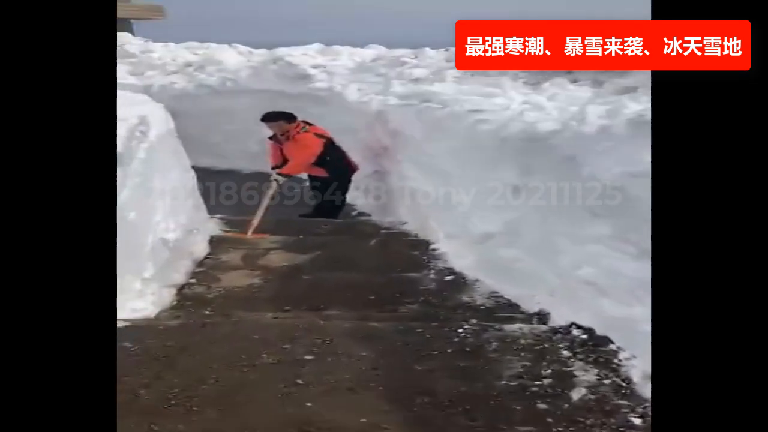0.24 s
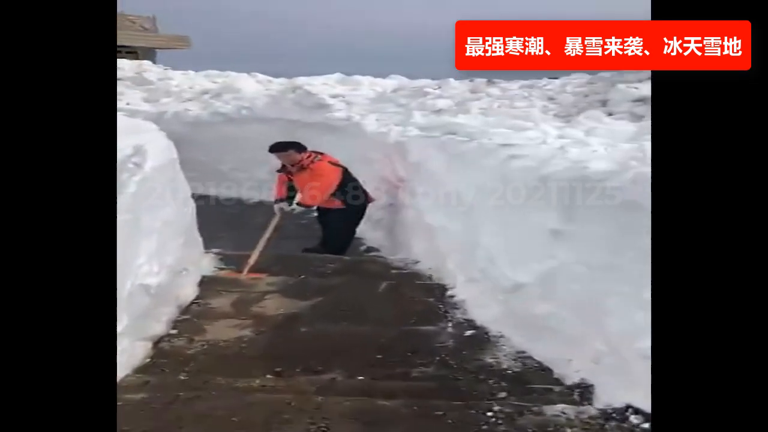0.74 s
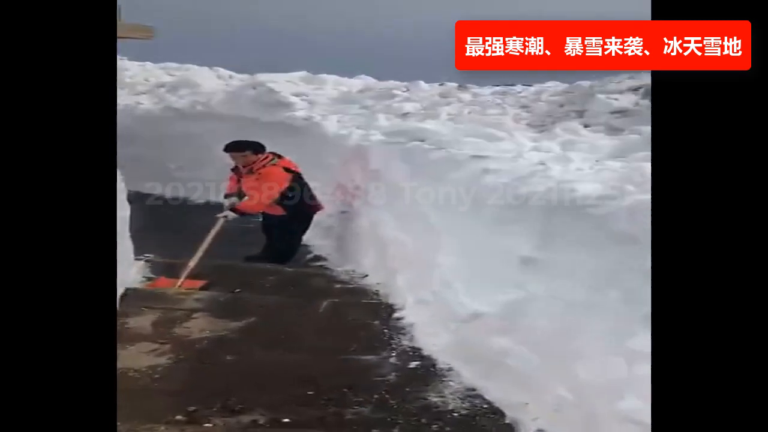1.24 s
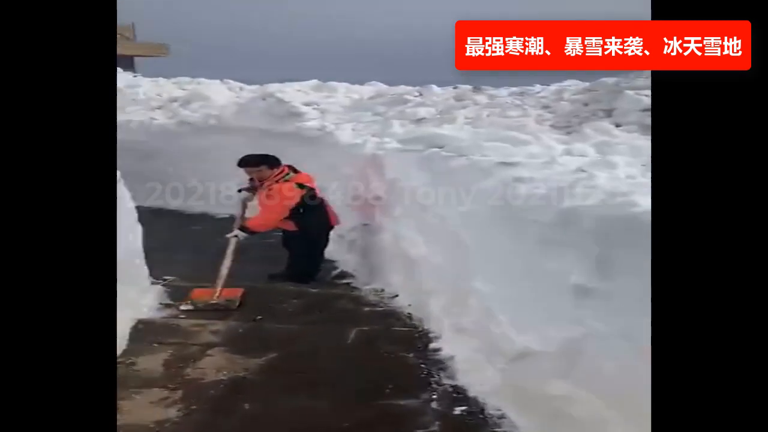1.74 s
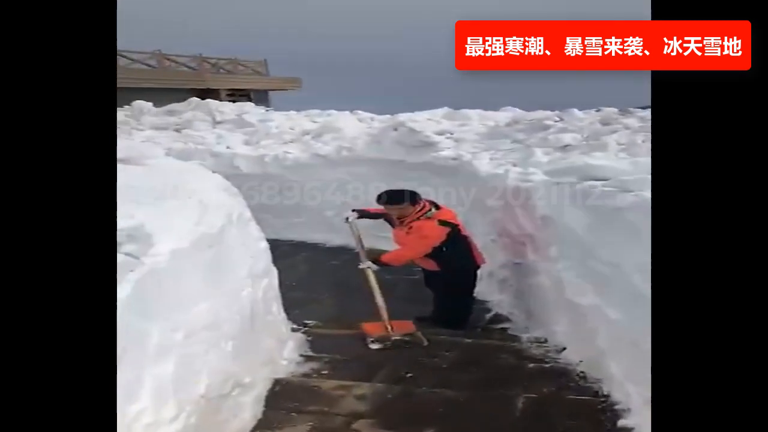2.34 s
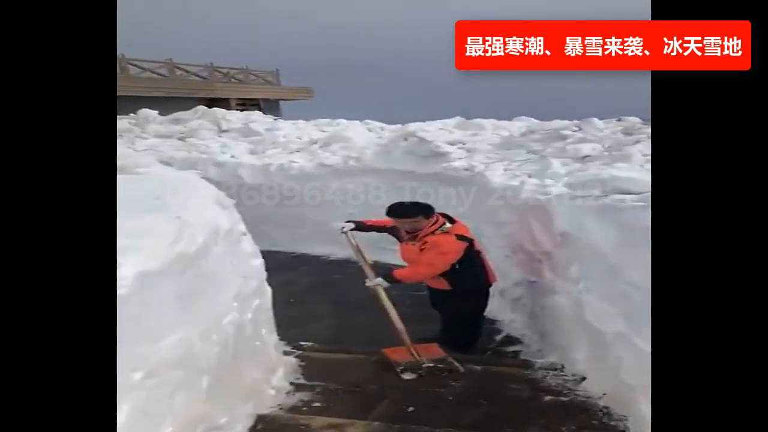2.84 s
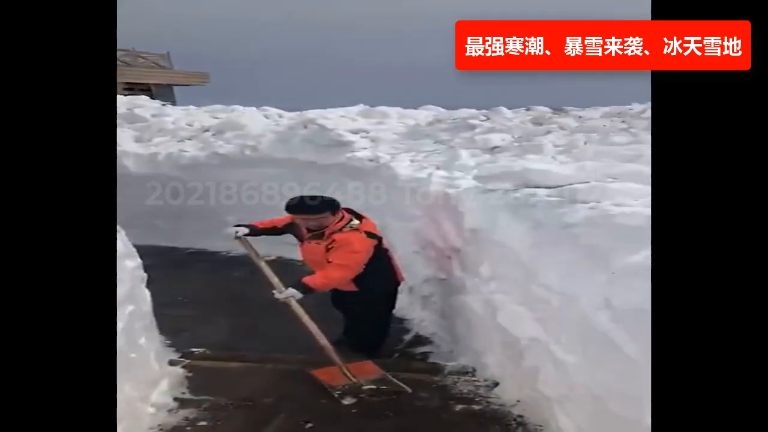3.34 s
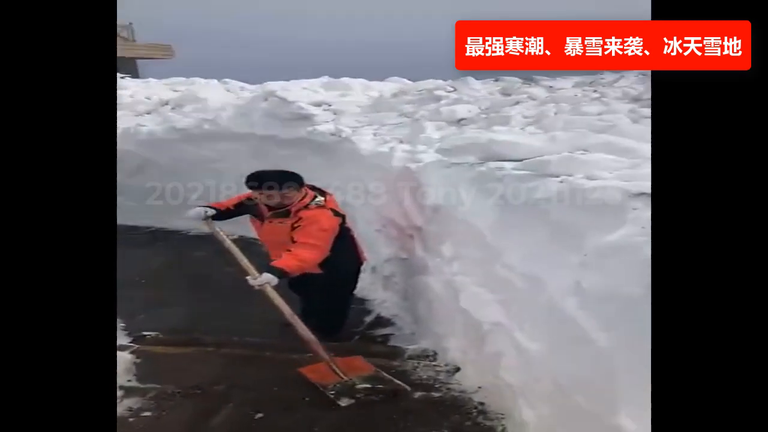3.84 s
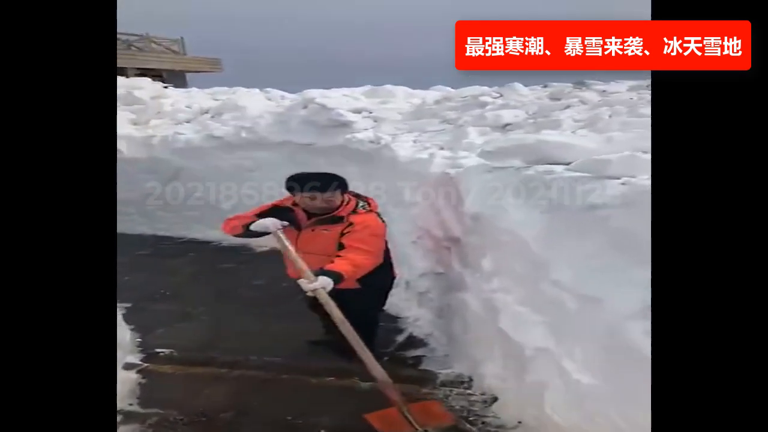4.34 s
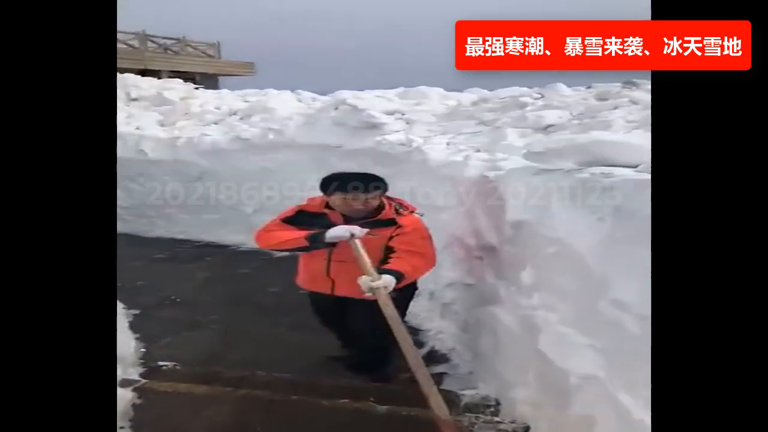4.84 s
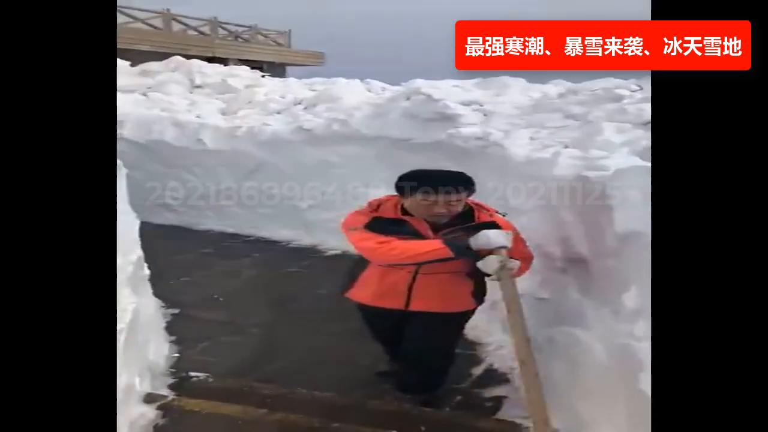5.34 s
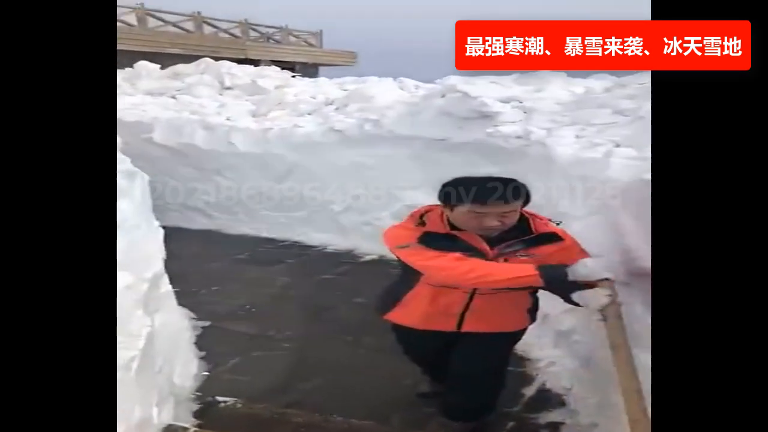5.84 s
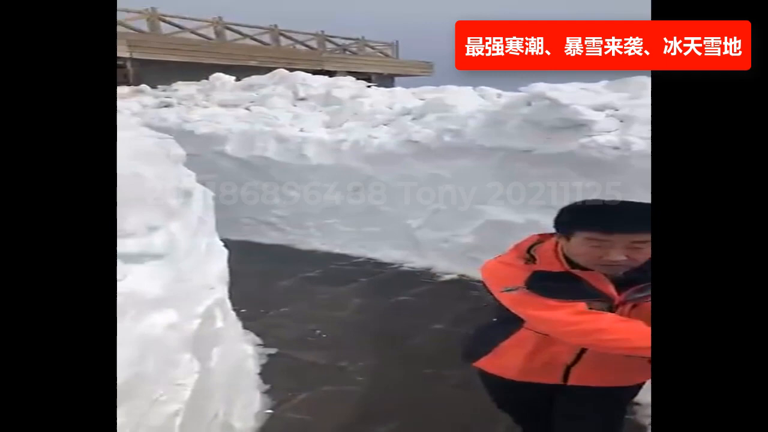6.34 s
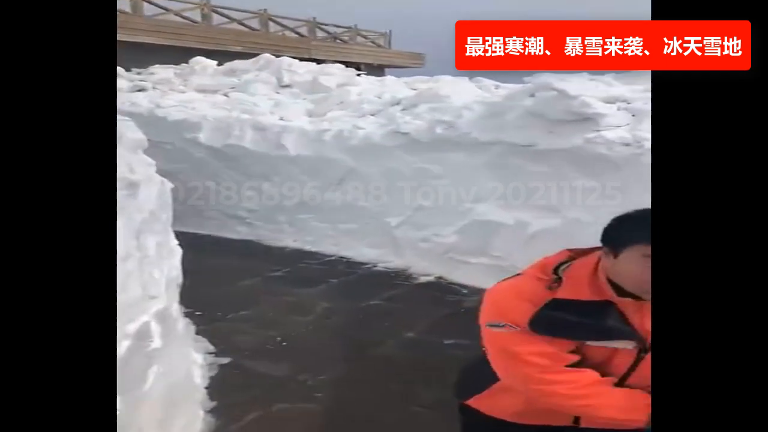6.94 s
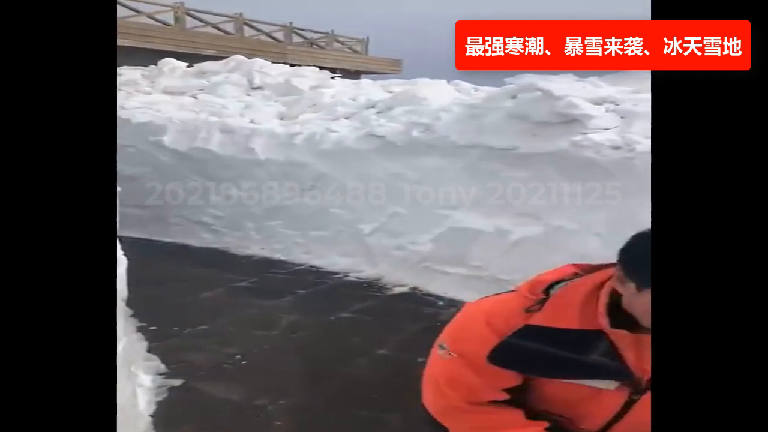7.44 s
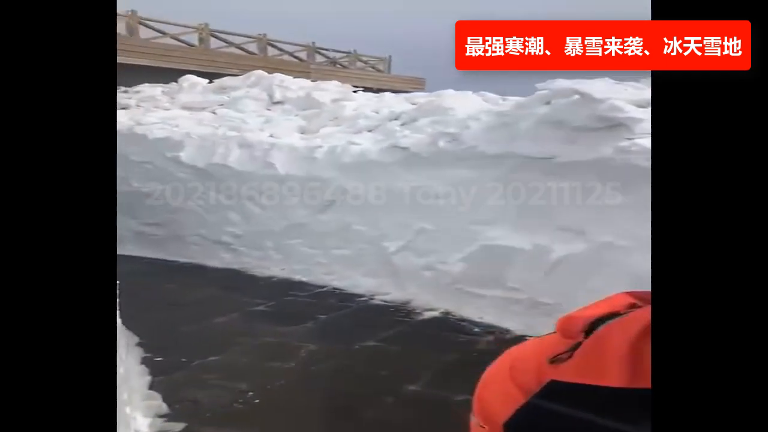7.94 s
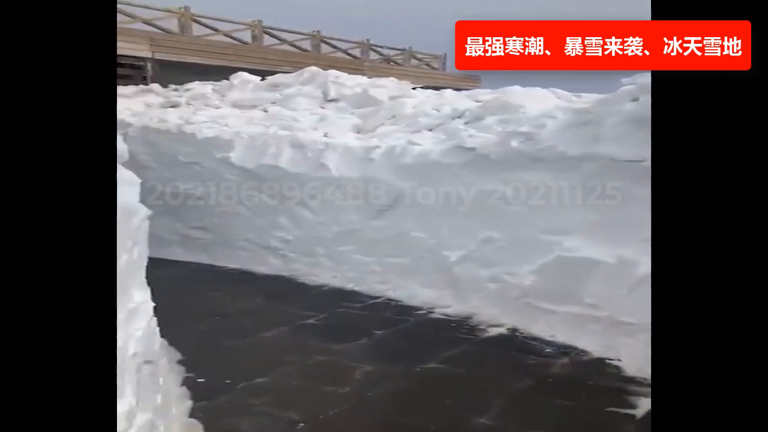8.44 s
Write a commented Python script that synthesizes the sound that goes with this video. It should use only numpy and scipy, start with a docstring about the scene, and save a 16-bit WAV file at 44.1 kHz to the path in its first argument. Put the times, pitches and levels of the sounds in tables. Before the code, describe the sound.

A shovel is pushed over rough paving between snow walls, heard close, the same in both channels, with lumpy wind rumble on the microphone and faint hiss throughout. It opens with a brief scrape, then light ticks and scuffs, with very faint, airy low moans near 0.3 and 1.2 s. From 1.8 s the knocks grow harder, with a loud clack at 2.1 s and scattered taps after. From about 3.2 to 5.2 s forceful shoves grind, ringing the blade with harsh grit and crunching snow; a sharp hit at 3.9 s clips. A quieter gap holds a few knocks. At 6 s a bright crack starts another crunchy scrape, ending with a heavy knock and thump at 6.66 s. Then scraping turns faint, with sparse taps, a barely audible moan at 7.8 s, dull thumps around 8.2 s and small clicks to the end at 8.7 s. The echo is short and dry.

```python
"""A shovel blade is dragged and pushed over a paved path between snow walls: 8.7 s, in order of time.
First come scrapes and knocks on the paving, with two faint moans; the knocks grow from 1.8 s.
From 3.2 s hard shoves excite the blade's modes with grit and crush snow; another scrape follows at 6 s.
A heavy knock and thump fall at 6.66 s; then quieter knocks, fainter scraping, a late moan and more thumps.
Boots thump, noise rumbles as wind on the microphone throughout, and the highest peaks clip."""
import sys
import numpy as np
from scipy import signal
from scipy.fft import rfft, irfft, next_fast_len
from scipy.io import wavfile
from scipy.ndimage import uniform_filter1d

SR = 44100
rng = np.random.default_rng(int(sys.argv[2]) if len(sys.argv) > 2 else 0)


def pcm_store(signal):
    """Save signal as 16-bit PCM."""
    levels = np.round(np.clip(np.atleast_2d(signal), -1, 1) * 32767)
    wavfile.write(sys.argv[1], SR, levels.astype(np.int16).T)


N = 383229  # samples in the scene


def gain_of(db):
    """Level to amplitude ratio: 20 dB is a factor of ten."""
    return 10 ** (np.asarray(db) / 20)


def evened(x):
    """Power normalisation: scales a signal to rms 1."""
    return x / np.sqrt(np.mean(x ** 2) + 1e-20)


def curves(rows):
    """Linear interpolation: each column after t/s becomes one value a sample."""
    times, *columns = np.transpose(rows)
    return [np.interp(np.arange(N) / SR, times, column) for column in columns]


def add(mix, s, sound):
    """Superposition: adds a sound into the mix at time s."""
    part = mix[..., max(round(s * SR), 0):][..., :sound.shape[-1]]
    part += sound[..., :part.shape[-1]]


def colour(x, points):
    """Spectral shaping: weights x along a log-frequency axis, then scales it to rms 1."""
    f, db = np.transpose(points)
    size = next_fast_len(N)
    hz = np.fft.rfftfreq(size, 1 / SR)
    weight = gain_of(np.interp(np.log(hz + 1), np.log(f + 1), db))
    return evened(irfft(rfft(x, size) * weight)[:N])


def wander(per_s):
    """Low-passed random process of rms 1 that changes about per_s times a second."""
    span = max(round(SR / per_s / 2), 2)
    once = uniform_filter1d(rng.standard_normal(N), span)
    return evened(uniform_filter1d(once, span))


def grit(level_db, per_s, spread_db):
    """Shot noise: random clicks of either sign, a few large, denser as the stroke gets harder."""
    # per_s is the click rate at a level of -19.5 dB
    rate = np.clip(per_s * gain_of(.4 * (level_db + 19.5)) / SR, .01, 1)
    clicks = (rng.random(N) < rate) / np.sqrt(rate)  # power independent of density
    size_db = spread_db * np.minimum(rng.exponential(1, N), 5)
    return gain_of(level_db) * evened(clicks * gain_of(size_db) * rng.standard_normal(N))


# Underlying scrape of the edge throughout, faint to strong, beneath the shoves: t/s, ring level/dB,
# brightness/(dB per octave), snow crunch level relative to the ring/dB
SCRAPE_BED = [(0.0, -17.5, -14, -12.5), (0.14, -37, -9, -6.5), (0.56, -35.5, -2.5, -11.5),
              (0.75, -46.5, -2, -8.5), (0.94, -53.5, 0, 1.5), (1.19, -30, -0.5, -5),
              (1.27, -31.5, -5.5, -10), (1.43, -44, -1, -8.5), (1.64, -36, 3, -19.5),
              (1.76, -35.5, -3, -11.5), (1.8, -48, -15, -7), (2.05, -27.5, 1, -10.5),
              (2.25, -36.5, -5.5, -7), (2.5, -31, -3, -13), (2.79, -35, -2, -10), (3.05, -26, -1, -8.5),
              (3.22, -20.5, -3.5, -12.5), (3.3, -19, 3.5, -7), (3.95, -14.5, 2, -10),
              (4.33, -15.5, 0.5, -6), (4.45, -12.5, 2.5, -11.5), (4.6, -19.5, -7, -4.5),
              (4.64, -21.5, -4, -7), (5.1, -19, 3, -6.5), (5.18, -36, 2, -1.5), (5.3, -37.5, 2, -6),
              (5.42, -29.5, -5.5, -16), (5.61, -43.5, -4, -16.5), (5.97, -32, 4, -10.5),
              (6.05, -27, 12, -1.5), (6.3, -23.5, -1, -1.5), (6.325, -26.5, -16, -1), (6.4, -29, -5, -9.5),
              (6.63, -26, -2, -8), (6.71, -26.5, -4, -15.5), (6.74, -54.5, 9, 1), (7.24, -37, -2.5, -5.5),
              (7.57, -41.5, -1.5, -6.5), (7.82, -45, 1, -8.5), (8.08, -38, 2, -3.5), (8.4, -36.5, -2, -15),
              (8.69, -37, 6, 2.5)]
# Shoves and scuffs on top: start t/s, length/s, ring level/dB, brightness/(dB per octave),
# snow crunch level relative to the ring/dB
SHOVES_AND_SCUFFS = [(0.018, 0.02, -19, -8, -18), (0.248, 0.047, -29.5, -5, -23.5),
                     (1.632, 0.086, -35.5, 3.5, -10), (1.873, 0.045, -19, 5.5, -10.5),
                     (2.275, 0.026, -18, -3.5, -12), (2.434, 0.017, -19.5, -4, -9.5),
                     (2.552, .13, -30.5, -8, -12), (2.724, 0.029, -28, -1, -10.5),
                     (2.845, 0.016, -22, -1, -14.5), (3.062, .04, -31.5, -1, 2),
                     (3.279, .02, -10.5, -2.5, -9.5), (3.322, 0.009, -12.5, 0, -8.5),
                     (3.35, 0.033, -15.5, -2, -1.5), (3.424, 0.049, -9.5, -1.5, -9.5),
                     (3.499, 0.11, -14.5, -4, -7), (3.692, 0.048, -18, 2.5, -0.5),
                     (3.819, 0.051, -9.5, 4, -4.5), (3.887, 0.069, -10, 1.5, -8),
                     (3.986, 0.013, -12.5, 0, -8.5), (4.051, 0.015, -8, -1, -14),
                     (4.098, 0.045, -11.5, 0.5, -10), (4.193, 0.042, -11.5, 2, -10.5),
                     (4.261, 0.035, -8.5, 3, -7.5), (4.464, 0.032, -13, 1.5, -5),
                     (4.533, 0.034, -13, 3, -5.5), (4.686, .04, -11.5, 2, -7), (4.743, 0.15, -6, 1.9, -8),
                     (4.917, 0.14, -11.5, 0, -6), (5.523, 0.033, -32, -1.5, -22),
                     (5.663, .025, -26, 4.5, -15), (6.012, 0.016, -17.5, -1, -9.5),
                     (6.07, 0.24, -14, 1, -6), (6.253, 0.04, -22.5, 0, -2), (7.598, 0.045, -30, -2.5, -6.5),
                     (8.124, .07, -24, -4.5, -10.5), (8.243, 0.085, -29, 1.5, -7)]
RISE_DB_PER_S, SAG_DB_PER_S, FALL_DB_PER_S = 457, 22.5, 380  # a shove bites, tires, then lets go


def stroke():
    """Power addition of scrape and shoves: ring/dB, power-weighted brightness and crunch/dB."""
    scrape_db, scrape_bright, scrape_crunch_db = curves(SCRAPE_BED)
    ring = gain_of(2 * scrape_db)  # doubled decibels give power
    bright = ring * scrape_bright
    crunch = ring * gain_of(2 * scrape_crunch_db)
    for s, length, db, tilt, snow_db in SHOVES_AND_SCUFFS:
        u = np.arange(N) / SR - s
        drop_db = RISE_DB_PER_S * np.maximum(-u, 0) + SAG_DB_PER_S * np.maximum(u, 0)
        drop_db += FALL_DB_PER_S * np.maximum(u - length, 0)  # added to the sag
        power = gain_of(2 * (db - drop_db))
        ring = ring + power
        bright = bright + tilt * power
        crunch = crunch + gain_of(2 * snow_db) * power
    return 10 * np.log10(ring), bright / ring, 10 * np.log10(crunch)


def mode(x, hz, width):
    """Damped resonance: a two-pole filter whose click response has energy near 1."""
    r = np.exp(-np.pi * width / SR)
    w = 2 * np.pi * hz / SR
    return signal.lfilter([np.sin(w) * np.sqrt(4 * (1 - r))], [1, -2 * r * np.cos(w), r * r], x)


def octaves(hz):
    """Logarithmic pitch: octaves above 1500 Hz, where brightness tilts pivot."""
    return np.log2(np.asarray(hz) / 1500)


# Bending modes of the blade: f/Hz, width/Hz, then relative drive level/dB in five holds:
# loose, dragged, pushed flat, tipped up, sliding back
BLADE_MODES = [(425, 110, -9, -16.5, -17, -23, -9.5), (572, 200, 1, -9.5, -15, -5.5, -1),
               (745, 145, 1, -5, -2, -25, -0.5), (861, 132, 4, -1.5, 0, -15, 0),
               (1004, 112, 0.5, 0.5, -3, 2.5, 1), (1121, 87, -2, -9, -19, -2, -3),
               (1218, 83, -2, -4, -11, -4.5, -7), (1414, 155, -0.5, -1.5, -4, -14, 0),
               (1726, 300, 0, -7, -4, -15, 6.5), (1906, 107, 0, -4.5, -5, 4.5, 2.5),
               (1959, 97, -3, -5.5, -1, 1.5, -13), (2148, 153, -1, -7.5, 1, -3.5, 1.5),
               (2385, 53, -3.5, -12, -4.5, -6, -2.5), (2643, 170, -2.5, -7.5, -2.5, -10, 6),
               (2901, 130, 0.5, -6.5, 0.5, -13.5, -9), (3007, 120, -0.5, -3.5, 0.5, 2, -6),
               (3022, 73, -2, -1.5, 1.5, -2, -21), (3293, 240, -1.5, -6, -2.5, -11, -25),
               (3835, 150, -5, -10, -10, -7, -2), (4120, 270, -4.5, -12.5, -18, -2, 2.5),
               (5250, 340, -29.5, -7, -21.5, -28, -19)]
# Way of holding the blade: from t/s, hold as an index into those five
GRIP_CHANGES = [(0, 1), (.12, 0), (2.5, 1), (3.72, 2), (5.2, 0), (5.96, 3), (6.4, 4), (6.72, 0)]
# Blade meets paving: t/s, pop level before its envelope/dB, nominal pop f/Hz, chatter drive level/dB,
# chatter brightness/(dB per octave)
PAVING_KNOCKS = [(0.014, -21, 810, -16, 0.5), (0.154, -30, 505, -18, -2.5), (0.405, -20, 680, -27.5, 4),
                 (0.994, -24, 1130, -36, 6), (1.11, -25, 2600, -32.5, 6), (1.149, -13, 1060, -28, 1.5),
                 (1.187, -15, 1430, -31, 6), (1.438, -22, 1940, -32, -4), (1.459, -19, 1800, -37.5, 6.5),
                 (1.746, -15.5, 1440, -28.5, 3), (1.77, -13.5, 1860, -33, 3),
                 (1.812, -20, 1410, -24.5, 3.5), (1.851, -7.5, 1850, -31, 8.5), (1.867, -5, 2580, -19, 4),
                 (1.9, -6, 1430, -14.5, 1), (1.944, -9, 1310, -18, 5.5), (2.068, -13.5, 560, -18.5, 3),
                 (2.112, 6, 1270, -1.5, -2), (2.27, -10, 900, -9.5, 1), (2.323, -17, 1290, -22, 1.5),
                 (2.386, -16, 3300, -20.5, -1), (2.421, -20, 1450, -8, -0.5), (2.564, -11, 1270, -24, -3),
                 (2.613, -20, 1280, -21.5, 2), (2.655, -12.5, 1035, -17, -1.5), (3.009, -5, 1290, -17, 3.5),
                 (3.351, -6, 1435, -4, -1), (3.67, -8, 800, -13.5, -16), (3.816, -9, 1340, -2, -10),
                 (3.899, 8.5, 2170, -2, 0), (5.12, -7.5, 1150, -10.5, 2), (5.353, -19, 936, -21, -0.5),
                 (5.414, -14.5, 745, -25.5, -4), (5.668, -4.5, 1080, -14, 5.5),
                 (5.844, -13.5, 1180, -20, 1.5), (5.978, -17, 1900, -19, -4), (6.004, 5.5, 1870, -8.5, 7),
                 (6.076, -1.5, 1030, -12.5, 5), (6.118, -4, 1060, -17, 0), (6.183, -4, 1065, -17, -3),
                 (6.3, -1, 2610, -18, 5), (6.354, -7, 1820, -9, 0.1), (6.656, 0.5, 393, -4, -5),
                 (6.678, -10, 386, -25, -2), (7.133, -20, 2190, -26, 1.5), (7.16, -30, 516, -27.5, 3.5),
                 (7.342, -21, 1100, -35, 0), (7.596, -17, 730, -25.5, 7.5), (8.203, -14, 523, -20, 0),
                 (8.219, -11, 1560, -29, 3.5), (8.453, -20, 2240, -23, 2.5), (8.571, -7, 1540, -16.5, -2),
                 (8.612, -13, 1650, -22.5, 5.5), (8.636, -21, 1330, -18.5, -2), (8.654, -16, 1610, -32, -5)]
CHATTER_T60_S, SKID_DB, SKID_T60_S = 0.058, -19.5, 0.22  # chatter, with a longer, weaker skid
SLIDE_DB, SLIDE_DB_PER_S = -14.5, 598  # the edge slides into each knock, swelling


def knock_envelope():
    """Exponential decay: swelling slide, then chatter and skid."""
    t = np.arange(SR // 4) / SR
    decay = gain_of(-60 * t / CHATTER_T60_S) + gain_of(SKID_DB - 60 * t / SKID_T60_S)
    contact = (1 - np.exp(-t / 0.0011)) * decay
    contact = np.maximum(contact, gain_of(SLIDE_DB) * (t < .003))  # no gap after the slide
    slide = gain_of(SLIDE_DB - SLIDE_DB_PER_S * t[SR // 20::-1])
    return np.append(slide, contact)


def blade(ring_db, bright):
    """Modal synthesis: grit and knocks drive the same modes, shared by hold and brightness."""
    hz, width, *held = np.transpose(BLADE_MODES)
    since, hold = np.transpose(GRIP_CHANGES)
    now = hold[np.searchsorted(since, np.arange(N) / SR, "right") - 1].astype(int)
    hold_db = uniform_filter1d(np.transpose(held)[:, now], SR // 20)  # the grip changes within 50 ms

    # the edge skips over the rough paving
    judder = evened(gain_of(.8 * wander(40) + 1.9 * wander(190)))
    # the contact point roams along the edge
    roam_db = 2.38 * np.array([wander(9.1) for _ in hz])
    share = gain_of(hold_db + roam_db + octaves(hz)[:, None] * bright)
    share = share / np.sqrt((share ** 2).sum(0))
    drive = judder * grit(ring_db, 12000, 3.05) * share

    lead = SR // 20  # samples of slide before contact
    drive = np.pad(drive, ((0, 0), (lead, 0)))
    envelope = knock_envelope()
    for s, _, pop_hz, chatter_db, tilt in PAVING_KNOCKS:
        near_db = -3.5 * np.log2(hz / pop_hz) ** 2  # modes close to the pop take most of the blow
        chance_db = 2.0 * rng.standard_normal(len(hz))
        share = gain_of(hold_db[:, round(s * SR)] + near_db + octaves(hz) * tilt + chance_db)
        burst = envelope * rng.standard_normal(len(envelope))
        add(drive, s, gain_of(chatter_db) * np.outer(share / np.linalg.norm(share), burst))
    # neighbouring modes have opposite signs
    return sum((-1) ** k * mode(drive[k, lead:], hz[k], width[k]) for k in range(len(hz)))


def pops():
    """Transient contact: a few cycles sink from 1.36 to 0.95 of nominal pitch as the edge digs in."""
    out, t = np.zeros(N), np.arange(SR // 20) / SR
    for s, pop_db, hz, *_ in PAVING_KNOCKS:
        u = hz * t  # nominal cycles elapsed
        turns = 0.952 * u + 0.66 * (1 - np.exp(-u / 1.6))
        onset = (1 - np.exp(-u / 1.14)) ** 2
        add(out, s, gain_of(pop_db - 2.6 * u) * onset * np.sin(2 * np.pi * turns))
    return out


# Spectral weighting of crushed snow: f/Hz, relative level/dB
CRUNCH_SPECTRUM = [(88, -31), (150, -20), (663, -9), (728, -4.5), (825, -3), (1110, -2.5), (4000, -11),
                   (6300, -12), (8190, -39.5), (13900, -120)]


def snow(crunch_db):
    """Clustered shot noise: crystals snap in clumps, and each knock also cracks the crust."""
    clumps = evened(gain_of(1.24 * wander(42) + 1.3 * wander(120)))
    snaps = clumps * grit(crunch_db, 14000, 3.87)
    whole = colour(snaps, CRUNCH_SPECTRUM) * np.std(snaps)
    lower = signal.sosfiltfilt(signal.butter(2, 2500, fs=SR, output="sos"), whole)
    cracks, t = np.zeros(N), np.arange(SR // 10) / SR
    for s, _, _, chatter_db, tilt in PAVING_KNOCKS:
        crack_db = chatter_db - 9.0 + 2.24 * tilt  # brighter knocks crack louder
        envelope = gain_of(crack_db - 60 * t / 0.047) * (1 - np.exp(-t / 0.00066))
        add(cracks, s, envelope * rng.standard_normal(len(t)))
    # 3 dB cut in the lower part, a lift of about 3.4 dB in the rest
    return gain_of(-3) * lower + 1.475 * (whole - lower) + cracks


def walls(x):
    """Diffuse reflection: snow walls swallow most sound, leaving a brief sparse tail."""
    taps = np.zeros(SR // 4)
    at = np.arange(200, len(taps) - 20, 20)
    decay = gain_of(-60 * at / SR / .11)  # t60 of 0.11 s
    taps[at + rng.integers(0, 20, len(at))] = rng.choice([-1., 1.], len(at)) * decay
    return signal.oaconvolve(x, taps / np.linalg.norm(taps))[:N]


# Dull thumps of boots and handle: t/s, level before onset and high-pass/dB, first f/Hz, last f/Hz, t60/s
BOOT_AND_HANDLE_THUMPS = [(0.01, -18, 90, 73, 0.21), (1.069, -27.5, 230, 192, 0.15),
                          (1.951, -26.5, 202, 150, 0.087), (2.979, -18.5, 70.6, 55.6, 0.13),
                          (5.314, -22.5, 100, 79.5, 0.28), (5.426, -23, 80, 55, 0.12),
                          (6.289, -18.5, 258, 224, 0.13), (6.36, -16.5, 254, 221, 0.15),
                          (6.657, 11, 637, 133, 0.036), (7.1, -30, 100, 80, 0.095),
                          (8.164, -14, 95, 76, 0.14), (8.2, -9, 604, 260, 0.036)]


def thumps():
    """Damped oscillation: each thump is a short low ring, sinking in pitch from a soft start."""
    out, t = np.zeros(N), np.arange(SR // 3) / SR
    for s, level_db, first_hz, last_hz, t60 in BOOT_AND_HANDLE_THUMPS:
        turns = np.cumsum(last_hz + (first_hz - last_hz) * np.exp(-t / 0.0045)) / SR
        # an unsteady, muffled ring
        turns += 0.092 * evened(uniform_filter1d(rng.standard_normal(len(t)), 300))
        envelope = gain_of(level_db - 60 * t / t60) * (1 - np.exp(-t / 0.0025))
        add(out, s, envelope * np.sin(2 * np.pi * turns))
    return signal.sosfilt(signal.butter(2, 45, "high", fs=SR, output="sos"), out)


# Drone of the handle: t/s, level at a blade ring of -27 dB/dB
HANDLE_LEVELS = [(0.0, -39.5), (0.6, -46.5), (0.89, -70), (1.04, -36.5), (1.4, -52.5), (2.03, -45.5),
                 (2.7, -52.5), (3.0, -46), (3.27, -38.5), (3.45, -41.5), (3.7, -33), (4.19, -45.5),
                 (4.7, -34.5), (5.13, -44), (5.35, -43), (5.9, -42.5), (6.2, -36), (6.58, -33), (6.95, -58),
                 (7.2, -48.5), (8.03, -49.5), (8.2, -36), (8.37, -54), (8.69, -51)]
# Spectral weighting of the drone: f/Hz, relative level/dB
DRONE_SPECTRUM = [(53, -36.5), (90, 0.5), (167, 5.5), (251, -0.5), (360, 2), (520, -5.5), (680, -25.5),
                  (1140, -120)]


def handle_drone(ring_db):
    """Band-limited noise: the handle's drone follows its own curve and, slightly, the blade's ring."""
    level_db = curves(HANDLE_LEVELS)[0] + 0.21 * (ring_db + 27)  # 0.21 dB per dB of ring
    return gain_of(level_db + 2.2 * wander(11)) * colour(rng.standard_normal(N), DRONE_SPECTRUM)


# Wind on the microphone: t/s, rumble level/dB
WIND_GUSTS = [(0.0, -43), (0.29, -47), (0.7, -43), (0.89, -50), (1.04, -42), (1.81, -52.5), (2.25, -46),
              (2.98, -53.5), (3.43, -43.5), (3.63, -43.5), (3.73, -37.5), (4.19, -54), (4.4, -36),
              (4.65, -45), (4.94, -48), (5.49, -42), (6.0, -51), (6.2, -43), (6.73, -46.5), (7.06, -52),
              (7.16, -41), (7.31, -46), (7.79, -51), (8.03, -49), (8.2, -36), (8.69, -52)]
# Spectral weighting of the rumble: f/Hz, relative level/dB
RUMBLE_SPECTRUM = [(8.8, -26), (15, 5.5), (36, -1.5), (65, -4.5), (102, -28.5), (150, -39.5), (200, -50),
                   (330, -120)]


def wind():
    """Amplitude-modulated low-frequency noise: a lumpy wind rumble."""
    level_db, = curves(WIND_GUSTS)
    return gain_of(level_db + 2.4 * wander(6)) * colour(rng.standard_normal(N), RUMBLE_SPECTRUM)


# Fuzzy low whistles: start t/s, length/s, starting level/dB, starting f/Hz
LOW_MOANS = [(0.249, 0.73, -33.5, 692.4), (1.193, 0.17, -35.5, 760), (7.828, .13, -42.5, 770)]


def moans():
    """Narrow-band noise on a rising carrier: faint moans that fade as they climb."""
    out = np.zeros(N)
    for s, length, db, hz in LOW_MOANS:
        t = np.arange(0, length, 1 / SR)
        pole = np.exp(-np.pi * 75 / SR)  # 75 Hz bandwidth
        slow = signal.lfilter([1], [1, -pole], rng.standard_normal((2, len(t))))
        carrier = np.exp(2j * np.pi * np.cumsum(hz + 50 * t) / SR)  # rises 50 Hz per second
        moan = evened(((slow[0] + 1j * slow[1]) * carrier).real)
        fade = gain_of(db - 19.5 * t)  # falls 19.5 dB per second
        add(out, s, fade * moan * signal.windows.tukey(len(t), .3))
    return out


# Spectral weighting of the outdoor hiss: f/Hz, relative level/dB
AIR_SPECTRUM = [(47, -27.5), (80, -2.5), (339, -4), (630, -5.5), (814, -2), (1660, -8), (3260, -15.5),
                (3990, -6.5), (6300, -19.5), (8190, -53.5), (13900, -120)]


def air():
    """Stationary broadband noise: outdoor hiss near -44.5 dB, wavering slightly."""
    return gain_of(-44.5 + 1.5 * wander(21)) * colour(rng.standard_normal(N), AIR_SPECTRUM)


def scene():
    """Linear superposition: everything reaches one microphone, copied to two channels."""
    ring_db, bright, crunch_db = stroke()
    shovel = blade(ring_db, bright) + pops() + snow(crunch_db)
    reflected = gain_of(-12.5) * walls(shovel)
    background = handle_drone(ring_db) + wind() + moans() + air()
    return np.tile(shovel + reflected + thumps() + background, (2, 1))


def low_pass(x, taps, hz):
    """Linear-phase filtering: a windowed-sinc low-pass at hz."""
    kernel = signal.firwin(taps, hz, window=("kaiser", 9), fs=SR)
    return signal.oaconvolve(x, kernel[None], "same")


def record(dry):
    """Non-linear distortion: narrow-band peaks clip near full scale and splash above that band."""
    narrow = low_pass(dry, 1501, 6390)
    clipped = np.clip(narrow, -.95, .95)
    return low_pass(clipped, 511, 15750)


dry = scene()
out = record(dry)
pcm_store(out)
```